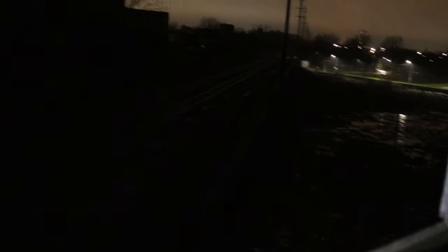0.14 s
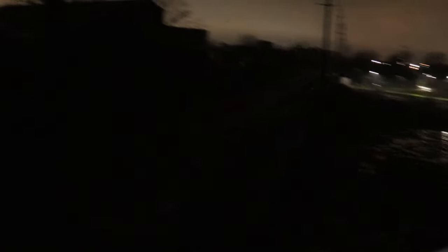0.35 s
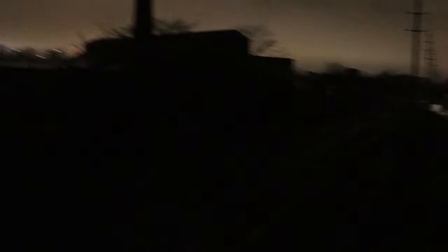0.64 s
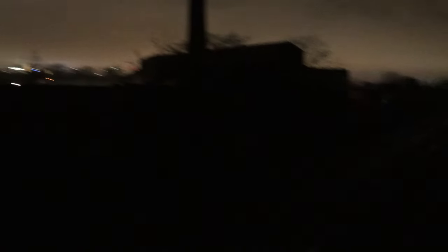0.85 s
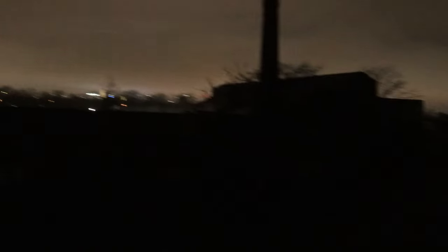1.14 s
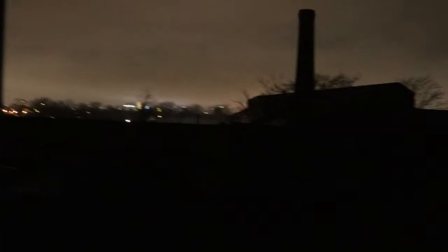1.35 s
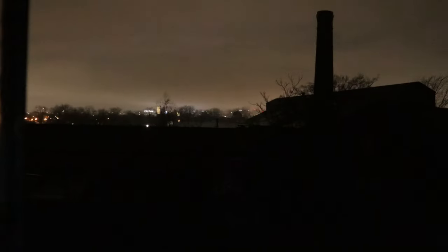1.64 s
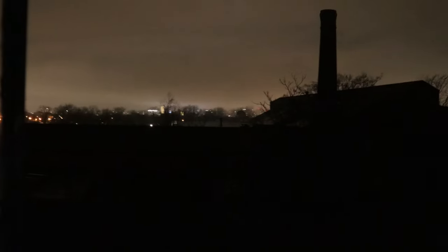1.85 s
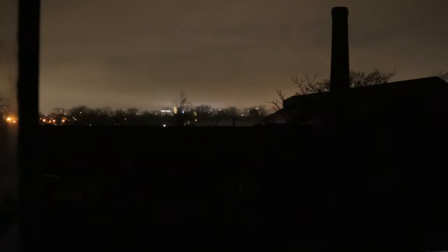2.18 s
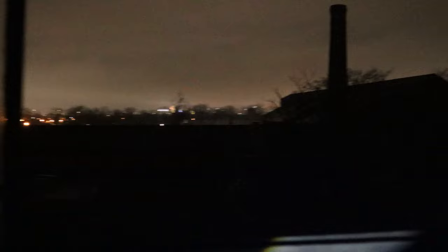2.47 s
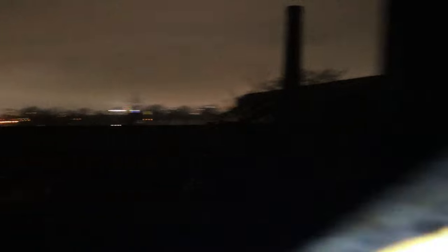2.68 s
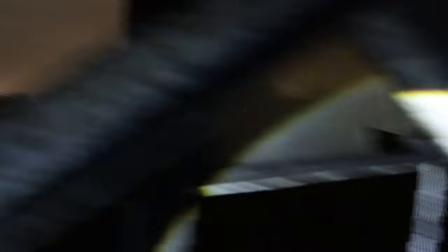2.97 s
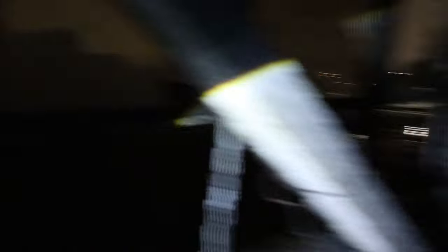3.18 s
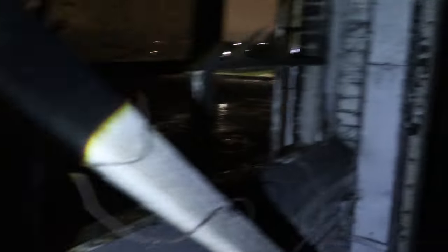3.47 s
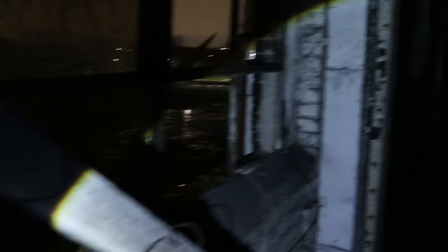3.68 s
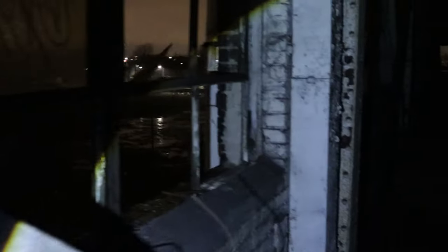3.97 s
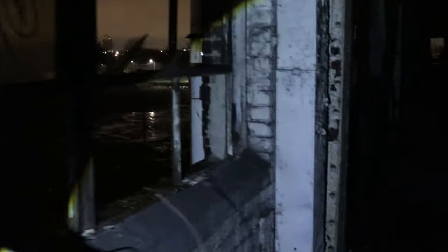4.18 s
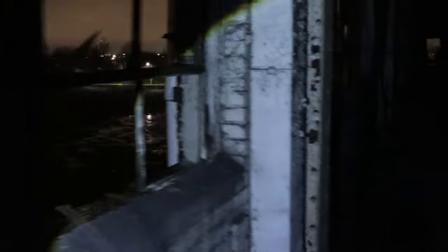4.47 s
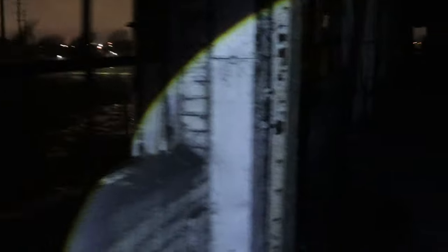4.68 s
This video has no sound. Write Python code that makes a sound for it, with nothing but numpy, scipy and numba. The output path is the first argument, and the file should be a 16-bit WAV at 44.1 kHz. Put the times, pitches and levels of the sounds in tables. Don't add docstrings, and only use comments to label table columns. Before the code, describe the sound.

A large bare factory hall at night, with a faint low rumble from the distant town throughout. The microphone is at chest height above someone walking on grit and broken glass. Tiny clinks appear at 0.1 s, and a sole slides in around 0.25 s with gritty scraping and a small shard ringing. From 0.6 to 1.2 s come light ticks, knocks and brittle cracks, a bright snap at 1.2. After a quieter gap, a pane gives way sharply at 1.77. Crunches follow near 2 s, then a shard rocks and chatters at 2.35-2.5, fading into small splinters. A near pause lasts until 3.2, when a thick shard cracks. Heavier, denser steps crush glass from 3.65, with a strong break at 3.78 and a shard ringing around 4. A big pane breaks at 4.45, a slab knocks low at 4.48, and the loudest crack hits at 4.6, followed by settling fragments. Short dull echoes trail the blows.

```python
import sys
import numpy as np
from scipy import signal
from scipy.fft import rfft, irfft
from scipy.io import wavfile
from scipy.ndimage import uniform_filter1d
from numba import njit

SR = 44100
rng = np.random.default_rng(int(sys.argv[2]) if len(sys.argv) > 2 else 0)


def gain_from_db(level_db):
    decades = np.asarray(level_db, float) / 20
    return 10 ** decades


def log_audio(samples):
    frames = np.atleast_2d(samples).T
    limited = np.clip(frames, -1, 1)
    pcm = np.round(limited * 32767).astype(np.int16)
    wavfile.write(sys.argv[1], SR, pcm)


N = 212982

# (frequency [Hz], density [dB per Hz])
TOWN_SPECTRUM = [(20, -3.5), (33, -4.5), (54, -8.5), (100, -6), (160, -5.5), (210, -9.5), (300, -11),
                 (500, -15), (1000, -20.5), (2000, -22), (4000, -24.5), (6300, -35), (10000, -46),
                 (16500, -51)]
# (frequency [Hz], density [dB per Hz])
GRIT_SPECTRUM = [(180, -42), (300, -12.5), (1090, -4.5), (1730, -2.5), (2380, -2), (2640, -0.5), (3820, 2),
                 (7000, -4), (9100, 0), (15400, -30)]
# (start [s], hold [s], level [dB], brightness [dB])
PRESSES = [(0.205, .01, -49.5, -12), (0.617, 0.15, -45.5, -17.5), (0.878, 0.16, -48.5, -18.5),
           (1.178, 0.038, -50, -23.5), (1.732, 0.18, -50.5, -20.5), (2.327, 0.1, -51, -15.5),
           (3.204, 0.084, -45, -14.5), (3.432, 0.25, -47.5, -17), (3.69, 0.10, -37.5, -14),
           (3.88, .04, -36.5, -8), (4.028, .12, -46.5, -20.5), (4.238, 0.22, -46.5, -16),
           (4.44, 0.097, -43, -16), (4.59, 0.12, -40.5, -14.5), (4.713, 0.014, -35, -11.5)]
# (time [s], peak [dB], body resonance [Hz], burst length [ms])
CRUNCHES = [(.0901, -50, 4180, 2.8), (.3544, -46, 3250, 3), (1.0894, -36, 4050, 1.5),
            (1.3468, -40, 5860, 2.7), (1.934, -28.5, 4840, 4.2), (2.128, -27.5, 4310, 4.8),
            (2.329, -47, 4270, 4.1), (2.359, -37, 4450, 2.7), (2.3923, -29.5, 5640, 3.2),
            (2.46, -33, 5400, 4.9), (2.4763, -34, 5300, 6), (3.2205, -36, 3500, 5),
            (3.3046, -25.5, 2980, 1.4), (3.653, -32.5, 1490, 4.6), (3.6705, -25.5, 3540, 9),
            (3.7032, -27, 1055, 2.3), (3.8305, -38, 1800, 2.6), (3.998, -28, 3080, 5),
            (4.0294, -35, 2940, 4), (4.2224, -31.5, 2080, 2.2), (4.2487, -19.5, 4050, 4),
            (4.432, -41, 3400, 3.1), (4.6024, -17, 3830, 6), (4.6127, -17, 5400, 2.2),
            (4.75, -20, 2190, 1.5), (4.812, -47, 4350, 3)]
# (time [s], peak [dB], body resonance [Hz], burst length [ms])
KNOCKS = [(.2305, -46, 4400, 9), (.7007, -33, 1600, 2.3), (.725, -34.5, 2600, 2.5), (.7494, -46, 2620, 3.6),
          (1.0002, -29.5, 1400, 3), (1.9544, -36.5, 2090, 3), (2.4244, -37.5, 880, 3.4),
          (2.448, -39, 664, 1.7), (2.5112, -30, 5340, 3.8), (2.5494, -39, 4500, 2.5),
          (3.265, -29, 2830, 6.7), (3.4464, -41, 870, 2.5), (3.5994, -40, 3100, 4.2),
          (3.7074, -21, 1510, 4.6), (3.8102, -23, 1700, 4.5), (3.8134, -23, 2600, 2.3),
          (4.132, -36, 2820, 1.2), (4.4817, -20, 1890, 7.6), (4.4934, -17, 1910, 2.4),
          (4.5021, -28, 1570, 0.91), (4.6021, -21, 6600, 2.5)]
# (time [s], peak [dB], body resonance [Hz], burst length [ms])
CRACKS = [(.2405, -33, 4300, 6), (.2685, -32, 5650, 7), (.5911, -44, 3900, 2.5), (.635, -38, 2910, 4.3),
          (.9062, -27, 4800, 3.5), (.9144, -25.5, 1730, 4.3), (.9278, -31, 1670, 5),
          (1.2081, -33, 4100, 2.6), (1.5326, -29.5, 3880, 3.5), (1.7536, -15, 3850, 5.2),
          (1.8638, -27.5, 4800, 3), (2.0203, -39.5, 1520, 2.5), (2.63, -37, 3420, 2.4),
          (2.6479, -32.5, 3400, 3.6), (3.2271, -19, 3250, 4.5), (3.2479, -30, 4400, 3),
          (3.5513, -30, 4980, 2), (3.5659, -29.5, 1500, 3.9), (3.7156, -27.5, 1680, 3.3),
          (3.7584, -21, 3750, 3.8), (3.7781, -15, 4000, 4.5), (3.8576, -25.5, 4800, 3.1),
          (3.874, -29, 4600, 6), (3.9484, -30, 6000, 3), (4.2604, -28, 4180, 3.4), (4.3592, -26, 2970, 7.2),
          (4.4453, -16, 2970, 2.5), (4.4504, -18, 6040, 14), (4.6971, -26.5, 2770, 4.4),
          (4.7652, -22, 3200, 2.9)]
# (time [s], peak [dB], body resonance [Hz], burst length [ms])
SHATTERS = [(.6644, -47, 2960, 3), (.6829, -31, 3680, 5), (.7739, -31, 4850, 2.7),
            (1.045, -33.5, 1610, 0.75), (1.0996, -39.5, 1350, 1.1), (1.1524, -43, 1670, 3.5),
            (1.2003, -23, 4230, 11), (1.225, -39, 3300, 1.3), (1.363, -38, 4860, 3.5),
            (1.3928, -49, 961, 2.4), (1.5777, -49, 3550, 3), (1.7699, -20, 3000, 5.6),
            (1.7739, -20.5, 2900, 0.46), (1.905, -38, 6000, 3.7), (2.2672, -32.5, 4840, 3.4),
            (2.4024, -33, 3740, 3.3), (2.4329, -32, 4250, 1.1), (2.4469, -38, 4000, 2.6),
            (2.579, -39.5, 3830, 7.1), (2.6185, -52, 1180, 3), (3.3982, -36.5, 5200, 1.5),
            (3.458, -33.5, 4770, 7), (3.7914, -38, 3500, 4.7), (3.9095, -24.5, 4100, 14),
            (3.9262, -25, 2950, 16), (4.2107, -34, 4420, 1.7), (4.334, -28.5, 2230, 4.4),
            (4.346, -35, 1360, 3.6), (4.4434, -27, 2750, 2.2), (4.8009, -34, 3340, 4.8)]
# (time [s], frequency [Hz], level [dB], T60
# [s])
PINGS = [(.09, 5530, -52.5, .1), (.13, 5600, -52.5, 0.076), (.591, 9400, -61, 0.23),
         (0.639, 2910, -38.5, .1), (0.641, 4020, -40, 0.072), (.682, 13400, -57, .06),
         (.726, 8760, -48, 0.087), (.775, 4950, -35, .05), (0.915, 1630, -34, .02), (.93, 2290, -36, .04),
         (1.532, 6550, -45.5, 0.046), (3.398, 5060, -31, 0.025), (3.461, 4950, -35, 0.094),
         (3.567, 5400, -36, 0.06), (3.869, 9560, -39, 0.09), (3.915, 2924, -25, .05),
         (4.387, 3250, -43, 0.22), (4.495, 1910, -33, 0.0088), (4.601, 303, -34.5, 0.23),
         (4.613, 13000, -20, .01), (4.614, 15000, -34, .01), (4.751, 2125, -23.5, 0.06)]
EARLY_PIECES = { "first shard": ([(4270, -38, 0.22), (3255, -41, 0.64), (5840, -42, .3), (8650, -58, 0.7)],
                [(.2445, -1, -8.5), (.273, -4, 5)]), "tile": ([(1225, -38, .02)], [(.775, 0, 0),
                (.999, 0, 0), (1.222, -4, 0)]), "chip": ([(8000, -31, .02), (10050, -44, .018)],
                [(1.0, -8, 13), (1.043, 5.5, -25), (1.1, -7.5, -15), (1.156, -25, 11), (1.2, 1.5, 41),
                (1.223, 2.5, -13), (1.934, -9, -5)]), "pane": ([(3780, -21, .031), (2790, -20, .04),
                (6150, -36, .07), (1290, -35, .03)], [(1.756, -1, 0), (1.772, -5, 1)]), }
NUDGED_PIECES = { "flake": ([(3950, -48, 0.044), (12500, -59, .04), (13300, -64, .05), (5500, -52, .02)],
                 [(.592, 0, 0)]), "crumb": ([(6600, -48, 0.033), (5300, -45, 0.033)], [(.612, 0, 0)]),
                 "bead": ([(3500, -44, .03), (4050, -41, .04)], [(.625, 0, 0)]),
                 "corner": ([(4850, -37, .08), (3400, -41, 0.088), (10200, -48, .04)], [(.684, 0, 0)]),
                 "needle": ([(8900, -52, .07)], [(.638, -2, 0), (.665, -2, 0), (.749, 0, 0), (.776, 3, 0)]),
                 "spark": ([(9500, -47, .02)], [(4.205, -1, 0), (4.758, 9, 0)]),
                 "tumbling shard": ([(2910, -27.5, 0.065)], [(3.999, 2, 0), (4.03, -4.5, 0), (4.087, -8, 0),
                 (4.135, -14, 0), (4.183, -15, 0)]), "thin corner": ([(4900, -50, .25)], [(.275, 0, 0)]), }
ROCKED_PIECES = { "rocking shard": ([(5650, -37.5, 0.085), (3500, -40, 0.15), (6390, -46.5, 0.13),
                 (7900, -55.5, 0.11)], [(2.36, -8, 0), (2.393, -2, 0), (2.434, -1, 17), (2.459, 1.5, 4),
                 (2.512, 2.5, 4)]), "wedged shard": ([(4270, -38, 0.15)], [(2.361, -1.5, 0), (2.402, -7, 0),
                 (2.435, -1.5, 0)]), "tiny shard": ([(11680, -36.5, 0.11), (15250, -48, .25)],
                 [(2.393, -15, 0), (2.458, -1, 0)]), "sliver": ([(3190, -36, 0.059), (7560, -50.5, 0.46),
                 (10680, -57, .18), (12900, -52, .16)], [(2.648, 0, 0)]),
                 "thick shard": ([(3080, -23, 0.063), (12800, -51, 0.23)], [(3.23, 0, 0)]), }
LATE_PIECES = { "bottle end": ([(1670, -24, 0.05), (3750, -21, 0.038)], [(3.777, 0, 0)]),
               "long strip": ([(6240, -33, 0.28), (9000, -45, 0.53)], [(3.95, 0, 0)]),
               "flung shard": ([(2910, -36, 0.76), (7040, -42, 0.57), (12740, -50, 0.37), (3860, -48, .43),
               (14300, -58, .13)], [(4.006, 0, 0)]), "big pane": ([(2612, -11.5, 0.081), (4110, -20, 0.07),
               (8200, -36, 0.13), (5500, -26, 0.08), (11730, -38, 0.05), (4480, -22, 0.053)],
               [(4.448, 0, 0), (4.4443, -12, 1)]), "last sliver": ([(8600, -45, .2), (9600, -49, 0.4),
               (13400, -52, .19)], [(4.698, 0, 0)]), "floor slab": ([(243, -44, 0.25), (326, -35.5, 0.074)],
               [(.698, -0.5, -2), (4.35, -4, 1), (4.482, 4.5, -5)]), }
PINNED_S = {"big pane": 0.029, "flung shard": 0.28}
# (time [s], peak [dB],
# frequency [Hz])
SNAPS = [
    (.9145, -24, 2000),
    (1.2003, -18, 5000),
    (1.7745, -16, 3000),
    (3.7785, -14, 3000),
    (4.4477, -12, 3500),
    (4.4823, -12, 1600),
    (4.6037, -5, 3800),
         (.2457, -30, 4300), (.2735, -31, 7000), (.9065, -32, 8000), (.9148, -30, 8000),
         (1.0015, -36, 9000), (1.044, -27, 8000), (1.204, -24, 7000), (1.2232, -28, 7500),
         (2.3935, -36, 12000), (2.4335, -37, 12000), (2.445, -38, 10000), (2.477, -38, 12000),
         (2.5125, -37, 12000), (3.2115, -40, 9000), (3.2305, -22, 4500), (3.267, -29, 5000),
         (3.3055, -28, 5500), (3.399, -29, 5500), (3.4615, -29, 6000), (3.5525, -29, 6000),
         (3.568, -28, 5500), (.6828, -34, 7000), (0.701, -37, 2200), (.7262, -36, 9000), (.7752, -32, 7000),
         (2.3602, -39, 8000), (2.372, -42, 9000), (2.5802, -38, 9000), (2.606, -52, 11000),
         (2.6172, -44, 11000), (2.63, -48, 12000), (2.6499, -31, 4000), (3.6705, -32, 2000),
         (3.6875, -36, 5000), (3.704, -21, 1500), (3.709, -26, 4500), (3.715, -20, 4000),
         (3.7485, -32, 4000), (3.7597, -18, 3500), (3.7905, -27, 8000), (3.8096, -23, 3000),
         (3.8142, -24, 3500), (3.858, -27, 4500), (3.917, -27, 5000), (4.1322, -36, 7000),
         (4.142, -39, 9000), (4.2117, -28, 6000), (4.2225, -38, 9000), (4.2604, -25, 6000),
         (4.3345, -26.5, 4970), (4.3601, -28, 3000), (4.4835, -28, 9000), (4.494, -31, 9000),
         (4.5635, -38, 7000), (4.6138, -17, 10000), (4.789, -31, 13000), (4.7995, -33, 13000),
         (4.8125, -34, 13000)]


def band(x, hz, width):
    return signal.lfilter(*signal.iirpeak(min(hz, .4 * SR), max(hz / width, .3), fs=SR), x)


def colour(x, points):
    hz, db = np.transpose(points)
    f = np.arange(len(x) // 2 + 1) * SR / len(x) + 1
    gain = gain_from_db(np.interp(np.log(f), np.log(hz), db))
    y = irfft(rfft(x) * gain, len(x))
    return y / y.std()


def peak(x):
    return x / np.abs(x).max()


def walk(rate):
    k = int(SR / rate)
    held = np.repeat(rng.standard_normal(N // k + 1), k)
    return 1.75 * uniform_filter1d(uniform_filter1d(held, k), k)[:N]


def add(out, s, x):
    i = int(s * SR)
    out[i:i + len(x)] += x[:len(out) - i]


def town():
    air = colour(rng.standard_normal(N), TOWN_SPECTRUM) * gain_from_db(.5 * walk(2))
    heave = band(band(rng.standard_normal(N), 30, 12), 30, 12)
    return gain_from_db(-51) * air + gain_from_db(-57.0 + 0.52 * walk(4.3)) * heave / heave.std()


def pressure():
    attack_s, release_db_s = 0.025, 92
    rest_db, rest_bright_db = -66, -7.5
    lump_swap = 0.92
    t = np.arange(N) / SR
    power = gain_from_db(2 * (rest_db + np.array([[0], [0], [rest_bright_db]])))
    for s, hold_s, db, bright_db in PRESSES:
        rise = np.clip((t - s) / attack_s, 0, 1)
        fall_db = release_db_s * np.maximum(t - s - attack_s - hold_s, 0)
        mix_db = np.array([[-lump_swap * (bright_db + 14.5)], [0], [bright_db]])
        power = power + (rise * gain_from_db(db - fall_db + mix_db)) ** 2
    return np.sqrt(power)


def breaks():
    lag = 0.34
    # splinter dB, thud dB, thud lag
    kinds = [(CRACKS, -33, -53, lag), (SHATTERS, -1.5, -20, lag),
             (KNOCKS, -25, -5, 0), (CRUNCHES, -13, -15.5, lag)]
    return [(s, db, hz, bright_db, thud_db - thud_lag * (db + 13.5), ms)
            for kind, bright_db, thud_db, thud_lag in kinds
            for s, db, hz, ms in kind]


def grit():
    lump_gain, coarse_gain, fine_gain = pressure()
    ticks = (rng.random(N) < 130 / SR) * rng.standard_normal(N) * 3.5
    coarse, fine = 0, 0
    for hz in 500 * 2 ** np.arange(0, 5, .4):
        crushed = rng.random(N) < hz / 8e4
        crumbs = crushed * np.clip(rng.standard_normal(N), -1.8, 1.8) * np.sqrt(8e3 / hz)
        crumbs = (crumbs + ticks * rng.random(N)) * gain_from_db(2.4 * np.clip(walk(70), -3, 1.2))
        crumbs = band(band(crumbs, hz, 0.46 * hz), hz, 0.46 * hz)
        if hz < 7000:
            coarse = coarse + crumbs
        else:
            fine = fine + crumbs * hz ** -1.7
    shaken = np.bincount((np.array(breaks())[:, 0] * SR).astype(int), minlength=N)
    spray = np.minimum(signal.lfilter([1], [1, -np.exp(-1 / (.022 * SR))], shaken), 1)
    fine = fine * (.4 + spray)
    coarse = colour(coarse, GRIT_SPECTRUM)
    lumps = signal.filtfilt(*signal.butter(2, 1700, fs=SR), coarse)
    ground = lump_gain * lumps + coarse_gain * (coarse - lumps) + fine_gain * fine / fine.std()
    return gain_from_db(4.6 * (spray - 0.89)) * ground


def cracks():
    out, t = np.zeros(N), np.arange(2048) / SR
    events = breaks()
    chance = rng.standard_normal((len(events), 3, len(t)))
    pieces = rng.random((len(events), 6))
    for (s, db, hz, bright_db, thud_db, ms), (sign, spread, floor), size in zip(events, chance, pieces):
        burst = np.exp(-t / (0.00073 * ms)) + gain_from_db(-17.0) * np.exp(-t / 0.02)
        onset = np.minimum(t / (.0003 + .00002 * ms ** 2), 1)
        swarm = sign * gain_from_db(5.5 * spread) * burst * onset
        others = sum(band(swarm, f, 0.065 * f) for f in hz * 2 ** (1.9 * size[:3] - .55))
        body = peak(band(band(swarm, hz, 0.31 * hz), hz, 0.59 * hz)) + 0.48 * peak(others)
        chips = sum(band(swarm, f, 0.36 * f) for f in 6500 * 2 ** (1.4 * size[3:]))
        splinters = peak(band(band(swarm, 7100, 8200), 6000, 8200)) + 0.31 * peak(chips)
        thud = band(band(floor * burst, 660, 2500), 660, 2500)
        blow = peak(body) + gain_from_db(bright_db) * peak(splinters) + gain_from_db(thud_db - 1) * peak(thud)
        add(out, s, gain_from_db(db) * blow)
    return out


def rings():
    struck = [(*ping, 1) for ping in PINGS]
    pieces = {**EARLY_PIECES, **ROCKED_PIECES, **LATE_PIECES, **NUDGED_PIECES}
    for name, (modes, hits) in pieces.items():
        free_s = PINNED_S.get(name, 1)
        for s, hit_db, tilt_db in hits:
            for hz, db, t60 in modes:
                octaves = np.log2(hz / modes[0][0])
                struck.append((s, hz, db + hit_db + tilt_db * octaves, t60, free_s))
    return struck


def clinks():
    out = np.zeros(N)
    struck = rings()
    jolts = rng.standard_normal((len(struck), 2, 256))
    for (s, hz, db, t60, free_s), (a, b) in zip(struck, jolts):
        t = np.arange(int(SR * np.clip(t60, .01, .7))) / SR
        t60 = max(t60, .01)
        step = t * (110 + hz / 60 + 14 / t60)
        index = np.arange(len(a))
        jolt = np.interp(step, index, a) + 1j * np.interp(step, index, b)
        rattle = 1 + np.minimum(t * hz / 40, min(1.2, .25 / t60)) * jolt
        ring = np.imag(rattle * np.exp(2j * np.pi * hz * t)) * np.exp(-np.log(1000) * t / t60)
        ring = ring * np.clip((free_s - t) / .004, 0, 1)
        flight = 1 + 2.07 * np.exp(-t / 0.0031)
        add(out, s, gain_from_db(db - 6.0) * ring * flight * np.minimum(t / 0.00087, 1))
    return out


def snaps():
    out = np.zeros(N)
    for s, db, hz in SNAPS:
        cycles = np.arange(-64, 64) / SR * hz
        pulse = np.sin(2 * np.pi * cycles) * np.exp(-(cycles / .6) ** 2)
        add(out, s - 64 / SR, gain_from_db(db) * peak(pulse))
    return out


@njit
def walls(x, lags, gain, damp):
    line, soft, out = np.zeros((8, 8192)), np.zeros(8), np.zeros(len(x))
    for i in range(len(x)):
        total = 0.
        for k in range(8):
            soft[k] += (1 - damp) * (gain[k] * line[k, (i - lags[k]) & 8191] - soft[k])
            total += soft[k]
        out[i] = total
        for k in range(8):
            line[k, i & 8191] = x[i] + soft[k] - total / 4
    return out


def scene():
    blows, tones = cracks() + snaps() + grit(), clinks()
    lags = np.array([701, 887, 1123, 1361, 1627, 1951, 2309, 2683])
    t60_s, damp = 0.74, 0.36
    sent = blows + gain_from_db(-6.5) * tones + 1e-18
    hall = walls(sent, lags, gain_from_db(-60 * lags / SR / t60_s), damp)
    return (blows + tones + gain_from_db(-20.5) * hall + town())[None]


def low_pass(x):
    return signal.sosfilt(signal.butter(12, 16820, fs=SR, output="sos"), x)


def record(dry):
    top = signal.ellip(8, .2, 70, 15900, fs=SR, output="sos")
    mix = signal.sosfilt(top, dry)
    return low_pass(mix)


dry = scene()
out = record(dry)
log_audio(out)
```